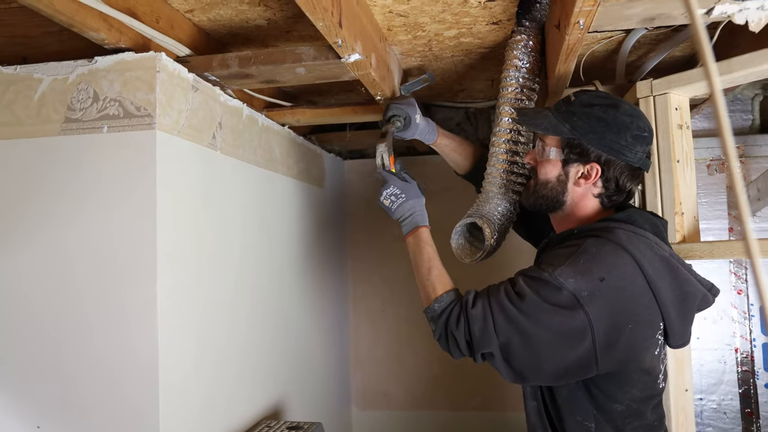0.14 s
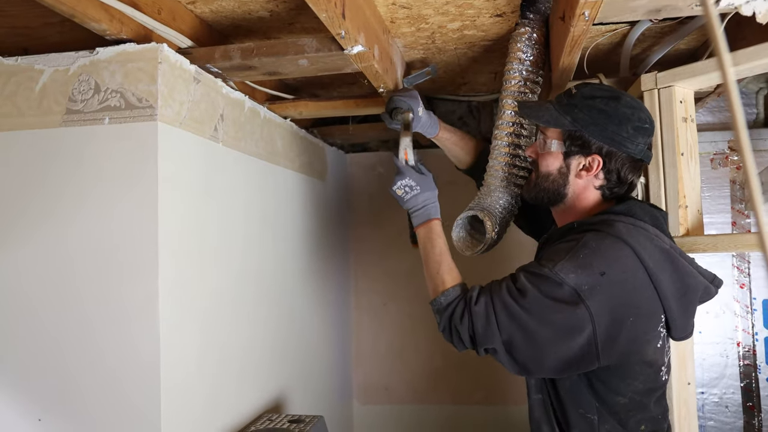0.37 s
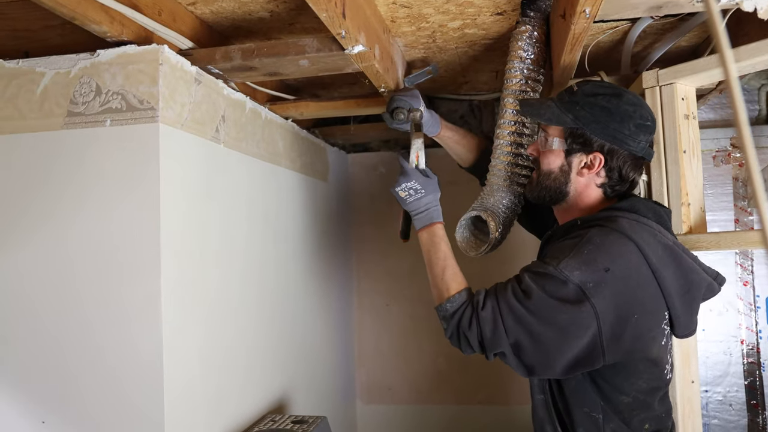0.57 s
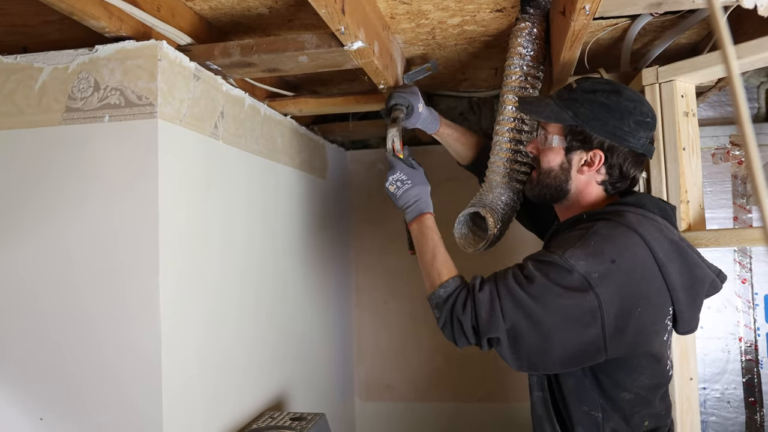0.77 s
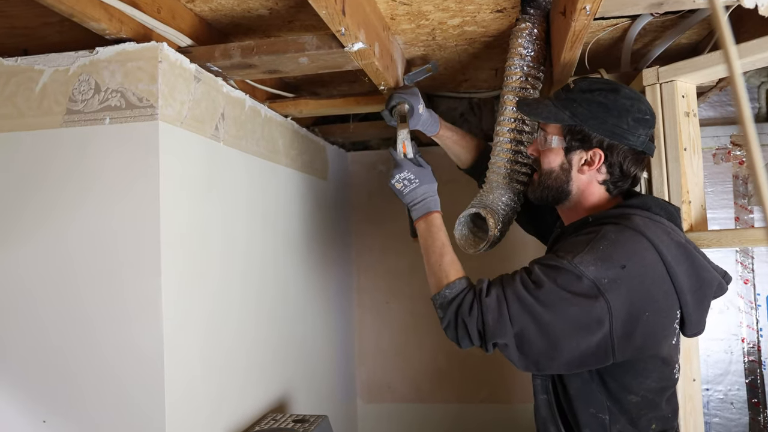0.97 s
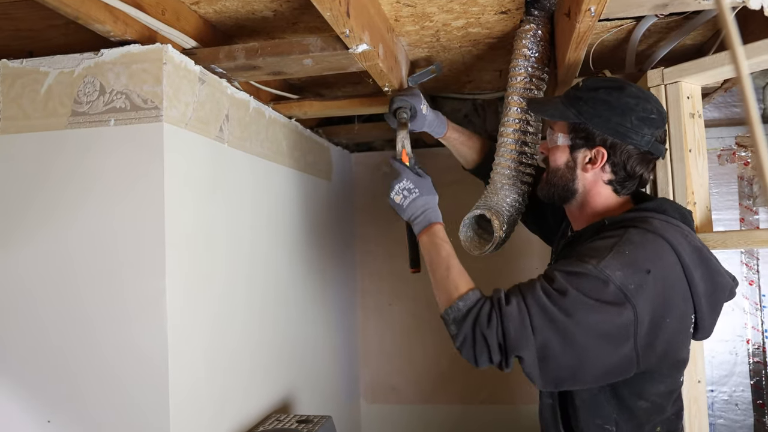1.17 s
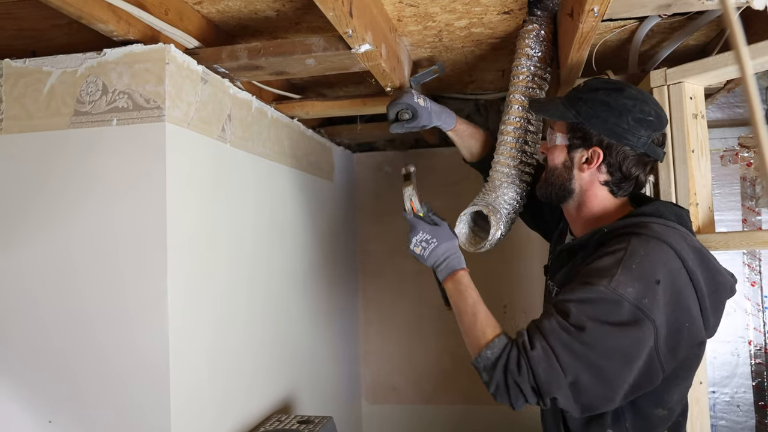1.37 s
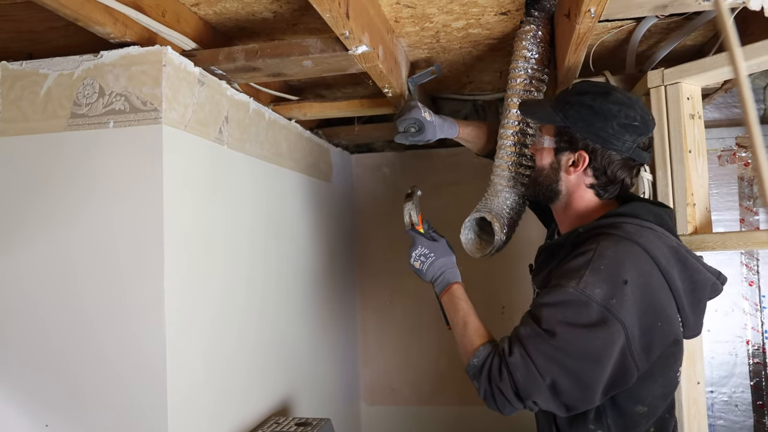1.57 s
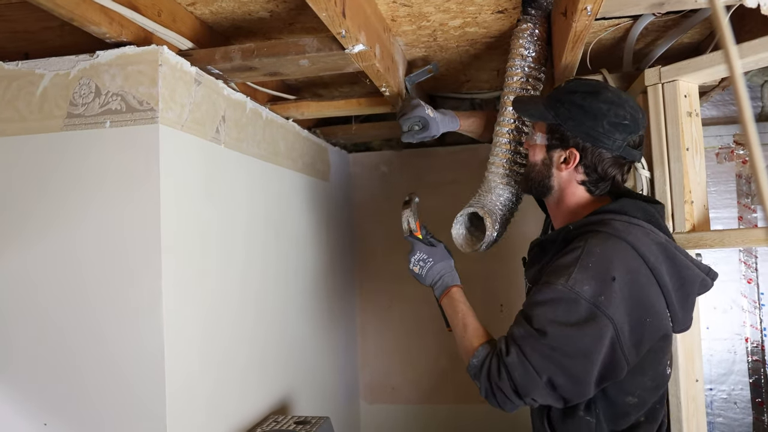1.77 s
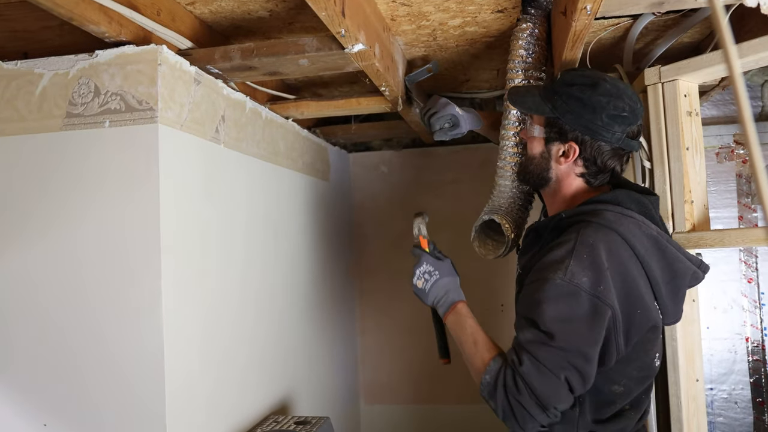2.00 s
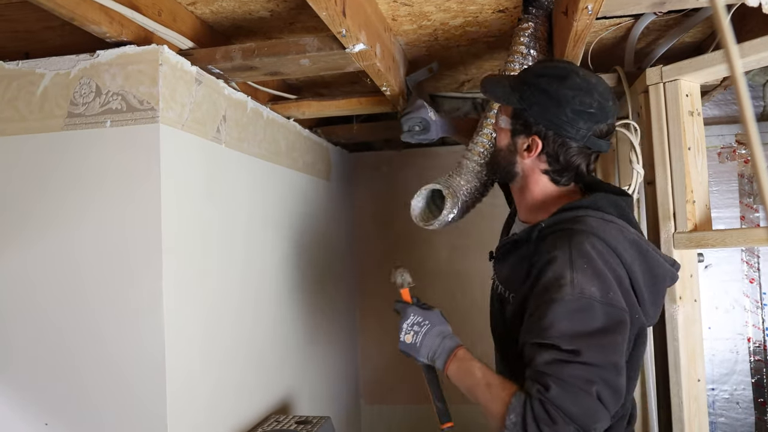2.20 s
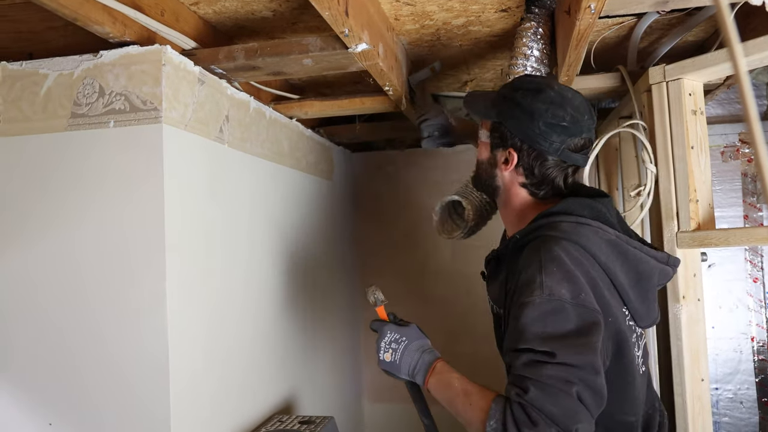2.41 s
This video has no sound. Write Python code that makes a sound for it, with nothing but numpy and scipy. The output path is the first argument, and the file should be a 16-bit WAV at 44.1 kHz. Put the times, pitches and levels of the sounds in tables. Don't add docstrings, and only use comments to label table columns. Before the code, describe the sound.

Hammering on metal: the ringing tail of an earlier blow opens, then four even, hard blows at about 0.2, 0.5, 0.8 and 1.1 seconds, each a steel crack with sheet clatter, boomy joists and short bare-room reverb. The bar's ring and low duct drone fade. From 1.6 come small dull knocks and faint rustles, a gritty scrape near 2.0, a bright metallic tick at 2.1, and last light knocks over quiet room noise.

```python
import sys
import numpy as np
from scipy import signal
from scipy.fft import rfft, irfft
from scipy.io import wavfile
from scipy.ndimage import uniform_filter1d

SR = 44100
rng = np.random.default_rng(int(sys.argv[2]) if len(sys.argv) > 2 else 0)


def master(y):
    cut = np.clip(np.atleast_2d(y).T, -1, 1)
    pcm = np.round(cut * 32767)
    wavfile.write(sys.argv[1], SR, pcm.astype(np.int16))


def to_linear_factor(level_db):
    exponent = np.asarray(level_db, float) / 20
    return 10 ** exponent


N = 108045
FLOOR_TOP_HZ = 15900


def read(points, hz):
    f, value = np.transpose(points)
    return np.interp(np.log(hz + 1), np.log(f + 1), value)


def evened(x):
    return x / np.sqrt(np.mean(x ** 2) + 1e-20)


def add(mix, s, sound):
    at = round(s * SR)
    part, rest = mix[max(at, 0):], sound[max(-at, 0):]
    n = min(len(part), len(rest))
    part[:n] += rest[:n]


def colour(x, gain):
    return irfft(rfft(x) * gain(np.fft.rfftfreq(len(x), 1 / SR)), len(x))


def bell(hz, octaves):
    return lambda f: np.exp(-(np.log2((f + 1) / hz) / octaves) ** 2)


def held(x, after_s, t60):
    return x * to_linear_factor(-60 * np.maximum(np.arange(len(x)) / SR - after_s, 0) / t60)


# (frequency [Hz], level [dB])
FLOOR = [(30, -12), (70, 16.5), (130, -3), (220, -1.5), (600, 0.5), (1500, -7.5), (2800, -14.5),
         (15500, -27.5)]
FLOOR_DB, PATCH_DB = -62.5, 1.5


def floor():
    frames, hz = N // 256 + 5, np.fft.rfftfreq(1024, 1 / SR)
    a, b, patches = rng.standard_normal((frames, 513, 3)).T
    patches = evened(uniform_filter1d(uniform_filter1d(patches, 12, 0), 10, 1))
    gain = to_linear_factor(read(FLOOR, hz)[:, None] + PATCH_DB * patches)
    z = (a + 1j * b) * gain * (hz < FLOOR_TOP_HZ)[:, None]
    return to_linear_factor(FLOOR_DB) * evened(signal.istft(z, nperseg=1024, noverlap=768)[1][:N])


def ducking(loud):
    recover_db_s, knee_db, db_per_db = 90, -48, 0.25
    power_db = 10 * np.log10(abs(uniform_filter1d(loud ** 2, 400)) + 1e-12)
    fall = np.arange(N) * recover_db_s / SR
    held_peak_db = np.maximum.accumulate(power_db + fall) - fall
    return to_linear_factor(-db_per_db * np.maximum(held_peak_db - knee_db, 0))


# (time [s], length [s], level [dB], centre [Hz], width [octaves])
RUSTLES = [
    (1.721, 0.084, -72, 3100, 2),
    (2.13, .12, -65.5, 2300, 1.8),
    (2.263, 0.056, -68, 11400, 0.13),
    (2.268, 0.051, -66.5, 4500, 0.99),
    (2.266, 0.045, -72, 14500, .1),
]


def rustles():
    out = np.zeros(N)
    for s, length, db, hz, octaves in RUSTLES:
        folds = to_linear_factor(3.9 * rng.standard_normal(64).repeat(128))
        x = colour(rng.standard_normal(8192) * folds, bell(hz, octaves))
        n = round(length * SR)
        add(out, s, to_linear_factor(db) * evened(x)[:n] * np.hanning(n))
    return out


# (time [s], level [dB])
SCRAPE = [
    (1.899, -99.5),
    (1.95, -83),
    (2.0, -56.5),
    (2.023, -49),
    (2.09, -49),
    (2.11, -57),
    (2.17, -69),
    (2.3, -100),
]
# (frequency [Hz], level [dB])
SCRAPE_COLOUR = [(900, -21.5), (1150, -5.5), (1900, -28), (4000, -11), (7000, -15.5), (11000, -18),
                 (14000, -15), (15800, -3)]
# (frequency [Hz], width [Hz], level [dB])
SCRAPE_RINGS = [(1200, 51, 4), (8800, 600, 1), (10760, 600, 8), (12600, 580, 11.5), (13900, 700, 7.5),
                (14700, 700, 10)]
GRAINS_PER_S, GRAIN_DB = 26000, 3


def scrape():
    grains = to_linear_factor(GRAIN_DB * rng.exponential(1, N)) * rng.standard_normal(N)
    grains = grains * (rng.random(N) < GRAINS_PER_S / SR)

    def metal(f):
        rings = sum(db * np.exp(-((f - hz) / width) ** 2) for hz, width, db in SCRAPE_RINGS)
        return to_linear_factor(read(SCRAPE_COLOUR, f) + rings) * (f > 700)

    t, db = np.transpose(SCRAPE)
    return evened(colour(grains, metal)) * to_linear_factor(np.interp(np.arange(N) / SR, t, db, left=-120))


# (time [s], level [dB], centre [Hz], width [octaves], t60 [s])
KNOCKS = [(1.636, -52.5, 356, 1.08, 0.11), (1.665, -58.5, 280, 0.27, 0.14), (1.681, -51, 870, 2.4, 0.13),
          (1.758, -57, 403, 0.36, 0.041), (1.897, -67.5, 1300, 0.26, 0.12),
          (1.908, -60.5, 802, 0.84, 0.088), (1.915, -57.5, 330, 0.31, 0.068),
          (1.918, -63.5, 102, 0.68, 0.059), (2.098, -53, 706, 0.71, 0.015),
          (2.098, -50.5, 1500, 0.17, 0.091), (2.112, -54.5, 1580, 0.088, 0.049),
          (2.103, -49, 58.7, 1.3, 0.025), (2.160, -61, 1330, 0.28, 0.14), (2.206, -58.5, 106.8, 0.15, 0.07),
          (2.267, -60, 1060, 0.14, 0.089), (2.286, -50, 746, 0.31, 0.13), (2.289, -63.5, 1480, 0.37, 0.22),
          (2.292, -56, 420, 0.11, 0.089), (2.291, -55.5, 145, 0.89, 0.16), (2.368, -61.5, 523, 0.22, 0.098),
          (2.385, -58, 490, 0.18, 0.12), (2.443, -60, 690, 1.4, 0.048)]
# (time [s], level [dB], centre [Hz], width [octaves], t60 [s])
TICKS = [(1.577, -72, 5870, 0.95, 0.032), (1.638, -74, 3530, 0.46, 0.026), (1.682, -50.5, 4670, 3, 0.1),
         (1.883, -70, 6960, 1.5, 0.023), (1.925, -71, 4300, 0.49, 0.022), (2.097, -37.5, 13700, 0.25, 0.11),
         (2.097, -44.5, 8500, 0.24, 0.15), (2.096, -46, 3930, 2.2, 0.16), (2.357, -73.5, 6960, 1.2, 0.011),
         (2.408, -74, 8000, 1.2, 0.017), (2.444, -64, 4950, 1.04, .04)]


def knocks():
    out, t = np.zeros(N), np.arange(8192) / SR
    for s, db, hz, octaves, t60 in KNOCKS + TICKS:
        x = colour(rng.standard_normal(len(t)), bell(hz, octaves))
        decay = to_linear_factor(-60 * t / (0.53 * t60)) + 0.23 * to_linear_factor(-60 * t / (1.6 * t60))
        x = x * (1 - np.exp(-t * hz / 0.66)) * decay
        add(out, s, to_linear_factor(db) * x / np.sqrt(np.mean(x[:440] ** 2)))
    return out


# (frequency [Hz], t60 [s])
ROOM = [(50, 0.87), (200, 0.41), (800, 0.36), (2500, 0.28), (7000, 0.23), (16000, 0.11)]
# (frequency [Hz], level [dB])
ROOM_COLOUR = [(50, -1.5), (1500, 3.5), (16000, 6.5)]
ROOM_DB = -11.5


def room(x):
    taps = np.zeros(SR)
    at = np.arange(200, SR - 20, 20)
    taps[at + rng.integers(0, 20, len(at))] = rng.choice([-1., 1.], len(at))
    hz, t, z = signal.stft(taps, SR, nperseg=512)
    decay_db = read(ROOM_COLOUR, hz)[:, None] - 60 * t / read(ROOM, hz)[:, None]
    tail = signal.istft(z * to_linear_factor(decay_db), SR, nperseg=512)[1]
    tail[:200] = 0
    return signal.fftconvolve(x, tail / np.linalg.norm(tail))


# (frequency [Hz], delay [s])
LAG = [(100, .003), (700, .003), (1500, .0013), (3000, .0002)]


def ring(hz, db, t60, rise, phase, length):
    t = np.arange(round(length * SR))[:, None] / SR
    t = np.maximum(t - read(LAG, hz), 0).astype(np.float32)
    hz, db, t60, rise, phase = (np.float32(v) for v in (hz, db, t60, rise, phase))
    shape = (1 - np.exp(-t / rise)) * np.exp(-np.float32(np.log(1000)) * t / t60)
    return (shape * np.sin(np.float32(2 * np.pi) * hz * t + phase)) @ np.float32(to_linear_factor(db))


# (frequency [Hz], rise time [s])
RISE = [(60, 0.0077), (400, 0.0034), (1500, 0.0019), (5000, 0.0014), (16000, 0.0052)]


def named(hz, db, t60, vary_db, length):
    chance = rng.standard_normal((len(hz), 2))
    x = ring(hz, db + vary_db * chance[:, 0], t60, read(RISE, hz), chance[:, 1] / 4, length)
    return x * np.minimum(np.linspace(4, 0, len(x)), 1)


# (frequency [Hz], level [dB])
SHEET = [(40, 0), (125, -3), (400, -2.5), (1330, -12), (2100, -16.5), (3700, -18.5), (7400, -33.5),
         (14500, -40), (16700, -54)]
# (frequency [Hz], width [Hz], level [dB])
GAPS = [(207, 27, -5), (528, 17, -1), (820, 70, -2), (1097, 29, -6.5), (1604, 72, -3.5), (1867, 100, -9),
        (2080, 200, -3), (2561, 96, -9.5), (3360, 120, -7), (4700, 130, -4.5)]


def sheet_db(hz, tilt):
    gaps = sum(db * np.exp(-((hz - f) / width) ** 2) for f, width, db in GAPS)
    return read(SHEET, hz) + gaps + tilt * np.log2((hz + 1) / 500)


# (frequency [Hz], t60 [s])
SHEET_T60 = [(50, 0.55), (150, 0.34), (500, 0.14), (1500, 0.16), (4000, 0.056), (9000, 0.058),
             (16000, 0.078)]


def clatter(tilt):
    t, noise, out = np.arange(8192) / SR, rng.standard_normal(8192), 0
    for hz in np.geomspace(125, 16000, 22):
        late = np.maximum(t - read(LAG, hz), 0)
        shape = (1 - np.exp(-late / read(RISE, hz))) * to_linear_factor(-60 * late / read(SHEET_T60, hz))
        band = colour(noise, lambda f: bell(hz, 1 / 3)(f) * to_linear_factor(sheet_db(f, tilt)))
        out = out + shape * band
    return out / np.sqrt(np.mean(out[:1300] ** 2))


def sheet(hz, own_db, phase, tilt):
    vary_db, clatter_db = 4, 0.5
    chance = rng.standard_normal((len(hz), 2))
    spacing_db = 10 * np.log10(np.gradient(hz))
    db = sheet_db(hz, tilt) + spacing_db + own_db + vary_db * chance[:, 0]
    x = ring(hz, db, read(SHEET_T60, hz), read(RISE, hz), phase + 0.8 * chance[:, 1], 8192 / SR)
    x = x / np.sqrt(np.mean(x[:1300] ** 2)) + to_linear_factor(clatter_db) * clatter(tilt)
    return x * np.hanning(2 * len(x))[len(x):] ** 0.5


def crack():
    level_db, centre_hz, octaves, t60 = -20.5, 10200, 0.35, 0.013
    t = np.arange(2048) / SR
    x = evened(colour(rng.standard_normal(len(t)), bell(centre_hz, octaves)))
    return x * np.minimum(t / 0.0027, 1) * to_linear_factor(level_db - 60 * t / t60)


# (frequency [Hz], level [dB], t60 [s], change with struck spot [dB per unit])
HIGH = [(2977, -14, .3, 5), (1316, -1, .2, 1), (1523, -4, .27, -2), (2309, -11, .18, 0), (2393, -7, .15, 1),
        (2919, -7.5, .39, 6), (3092, -3, .22, 3), (3626, 4, .07, 2), (4600, -14, .18, -1),
        (4880, -10, .26, 2), (5286, -16, .29, 5), (5846, -12, .15, 2), (8678, -24, .29, -9),
        (9577, -19, .25, -1)]
HIGH_DB, STEEL_S = -33, 0.5
TWIN_HZ, TWIN_DB = 18, -12


def steel(spot):
    hz, db, t60, by_spot = np.transpose(HIGH)
    db = HIGH_DB + db + spot * by_spot
    twin_hz = hz + TWIN_HZ * rng.standard_normal(len(hz))
    twins = named(twin_hz, db + TWIN_DB, t60, 2, STEEL_S)
    return twins + named(hz, db, t60, 1, STEEL_S)


# (time [s], strength [dB], brightness [dB per octave], bar ring [dB], joist boom [dB])
BLOWS = [
    (-.105, -14, 1, -39, 1),
    (.201, -12, 1.47, -36, 0.5),
    (0.506, -13, 1.34, -38, 1.5),
    (0.822, -11.5, 1.39, -36.5, -1.5),
    (1.120, -13, 1.97, -37, 3),
]
SPOTS = [-.5, -1, .9, .5, .9]
# (frequency [Hz], level [dB], t60 [s])
BODY = [(78.27, -13.5, 0.5), (125.4, 8.5, 0.08), (151.2, -4, 0.19), (162.5, -1, 0.3), (275.2, -1, 0.16),
        (354.5, -10.5, 0.35), (381.6, -5.5, 0.16), (420, -14.5, 0.36), (445, -9.5, .17), (593.4, -3, 0.18),
        (665, -15, 0.28), (713, 1.5, 0.078), (816, -19.5, 0.095), (296.7, -4, 0.23)]
# (frequency [Hz], level [dB], t60 [s])
PANEL = [(897, -3, .17), (1012, 1, .15), (1135, -4, .14), (1174, -2, .21), (1200, -2, .18), (1448, -8, .12),
         (965, 0, .14), (2790, -6, .08), (3138, 2, .05), (3709, -14, .22), (3880, 6, .04), (4226, -6, .12),
         (4457, -12, .18), (5150, 0, .04)]
# (frequency [Hz], level [dB], t60 [s])
BAR = [(519.1, -1, 1.64)]
# (frequency [Hz], level [dB], t60 [s])
DUCT = [(62.8, -4.5, 12), (130, 3, 2.7)]
BODY_DB, PANEL_DB, DUCT_DB = -4, -17.5, -51.5
GRIP_S, GRIP_T60 = 1.21, 2.65
DUCT_STOP_S, DUCT_STOP_T60 = 1.76, 0.096


def hammer():
    out = np.zeros(N)
    hz = np.sort(16700 * rng.random(520) ** 1.8 + 40)
    own_db, phase = 1.5 * rng.standard_normal(len(hz)), 2 * np.pi * rng.random(len(hz))
    for k, (s, db, tilt, bar_db, boom_db) in enumerate(BLOWS):
        hit = to_linear_factor(db - 6.5) * sheet(hz, own_db, phase, tilt)
        add(out, s, hit)
        add(out, s, to_linear_factor(ROOM_DB) * room(hit))
        add(out, s, to_linear_factor(db + BODY_DB + boom_db) * named(*np.transpose(BODY), 1.5, 0.45))
        add(out, s, to_linear_factor(db) * crack())
        add(out, s, steel(SPOTS[k]))
        add(out, s, to_linear_factor(db + PANEL_DB) * named(*np.transpose(PANEL), 2.5, STEEL_S))
        bar = to_linear_factor(bar_db + 7) * named(*np.transpose(BAR), 0, 1)
        duct = to_linear_factor(DUCT_DB) * named(*np.transpose(DUCT), 0.74, 1)
        if k + 1 < len(BLOWS):
            add(out, s, held(bar + duct, BLOWS[k + 1][0] - s, 0.13))
        else:
            add(out, s, held(bar, GRIP_S - s, GRIP_T60))
            add(out, s, held(duct, DUCT_STOP_S - s, DUCT_STOP_T60))
    return out


def scene():
    blows = hammer()
    return (blows + knocks() + rustles() + scrape() + floor() * ducking(blows))[None]


def band_limit(x):
    return signal.sosfilt(signal.butter(12, 16870, fs=SR, output="sos"), x)


def record(dry):
    low_cut_hz, edge_hz, limit, top_gate_db = 48, 16600, 0.87, -55
    x = signal.sosfilt(signal.butter(4, low_cut_hz, "high", fs=SR, output="sos"), dry)
    x = limit * np.tanh(x / limit)

    def below(hz):
        return signal.oaconvolve(x, signal.firwin(511, hz, window=("kaiser", 8), fs=SR)[None], "same")

    low = below(FLOOR_TOP_HZ)
    top = below(edge_hz) - low
    is_open = uniform_filter1d(abs(top), 200) > to_linear_factor(top_gate_db)
    gate = uniform_filter1d(1. * is_open, 100)
    return band_limit(low + gate * top)


dry = scene()
out = record(dry)
master(out)
```